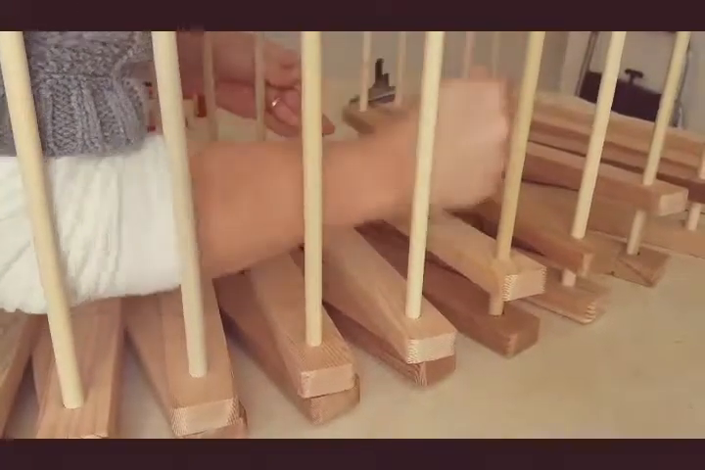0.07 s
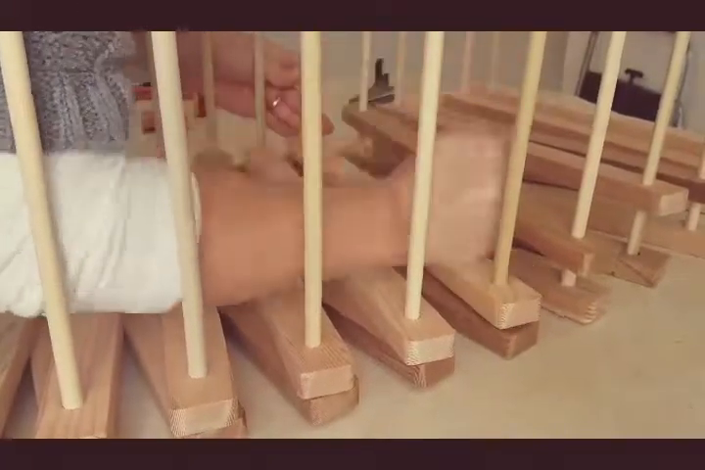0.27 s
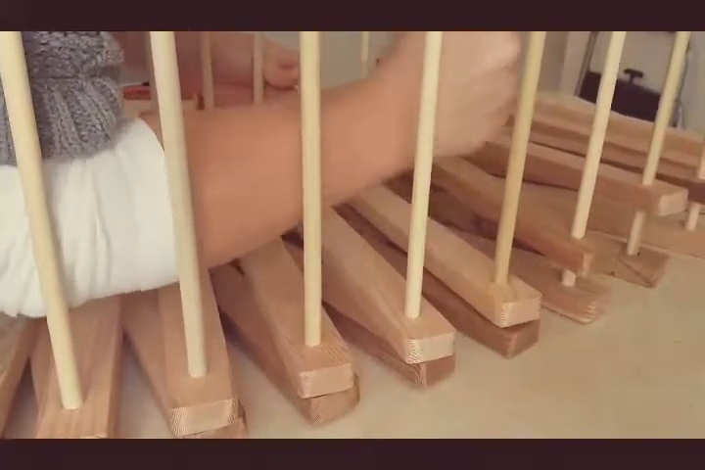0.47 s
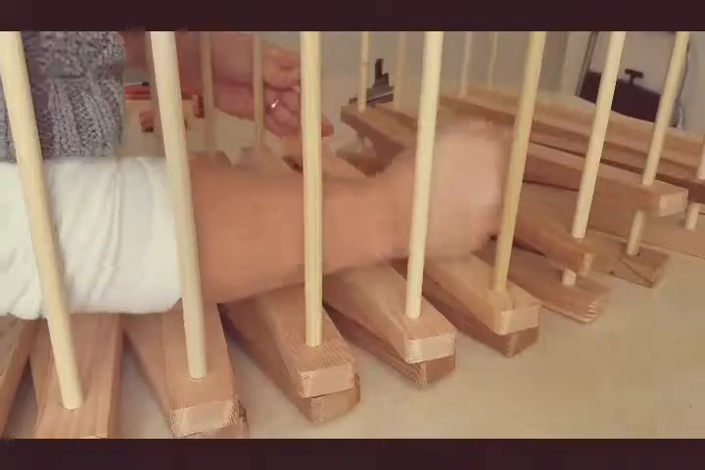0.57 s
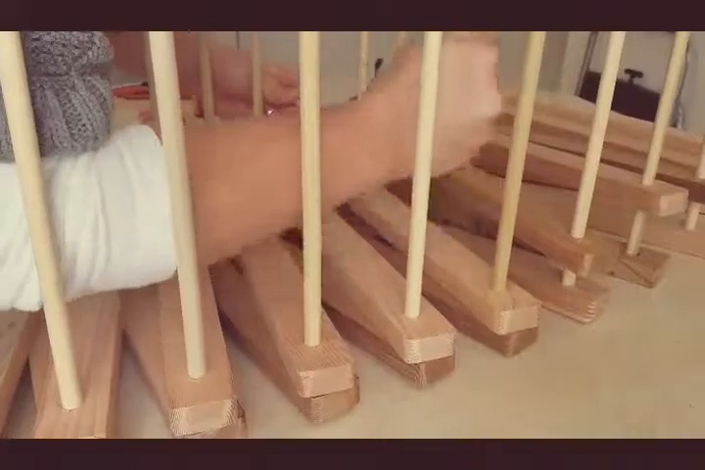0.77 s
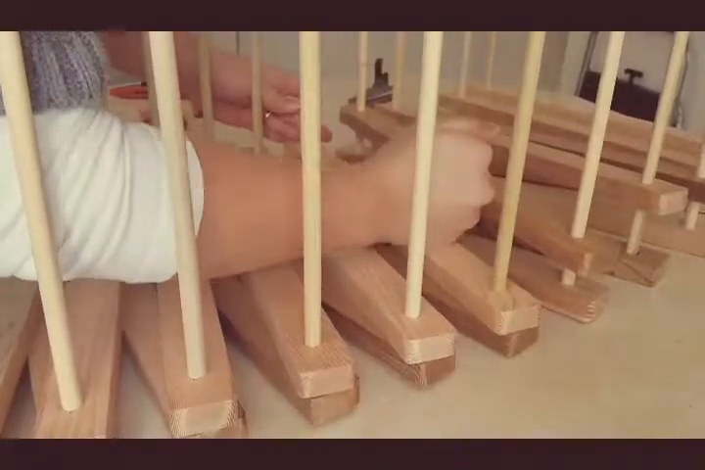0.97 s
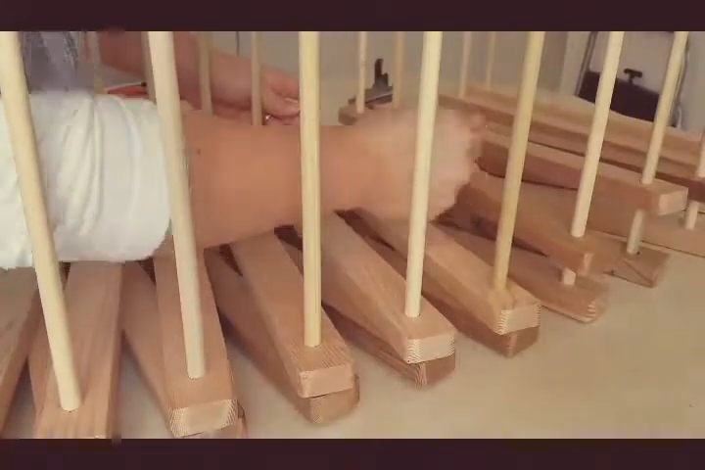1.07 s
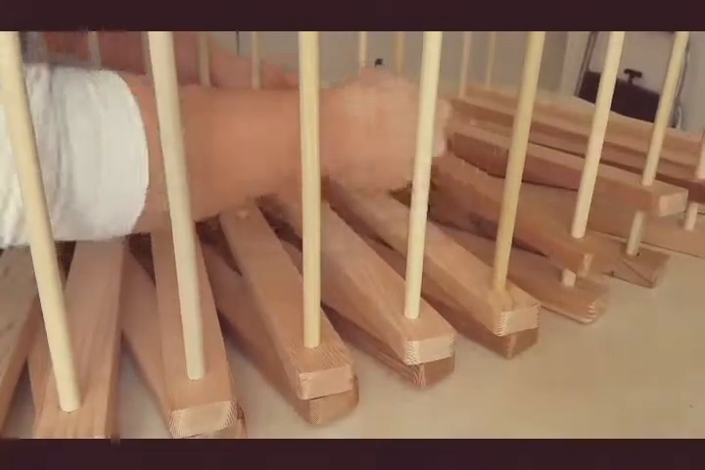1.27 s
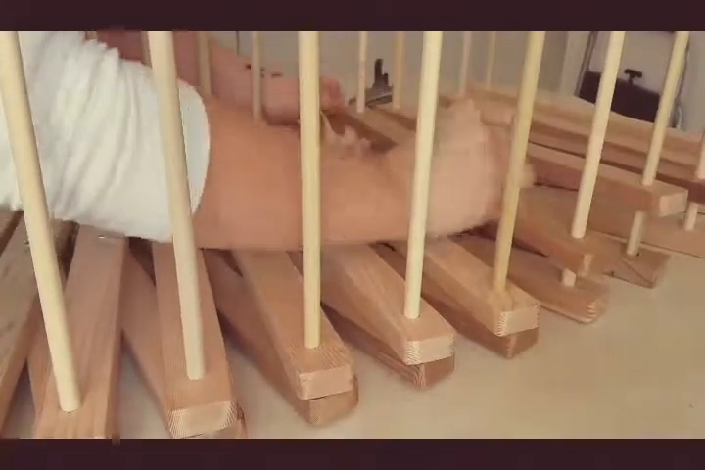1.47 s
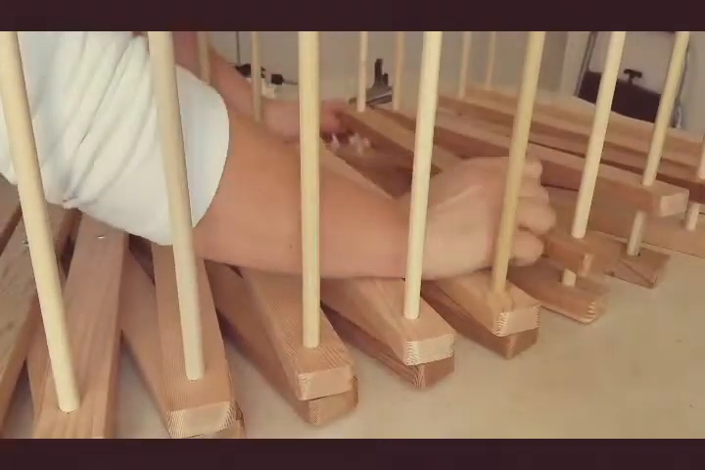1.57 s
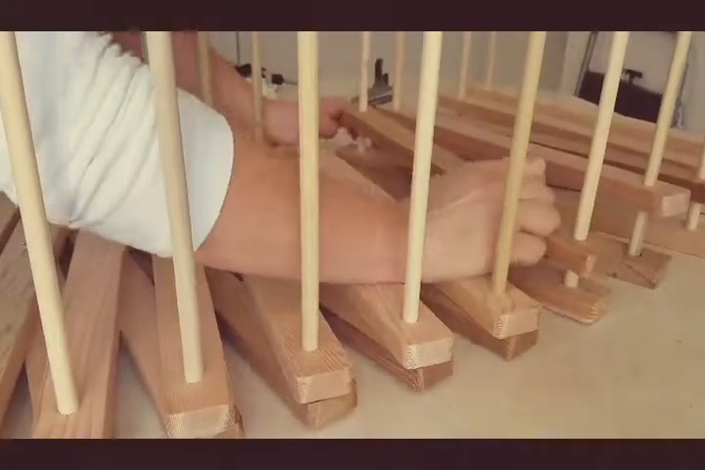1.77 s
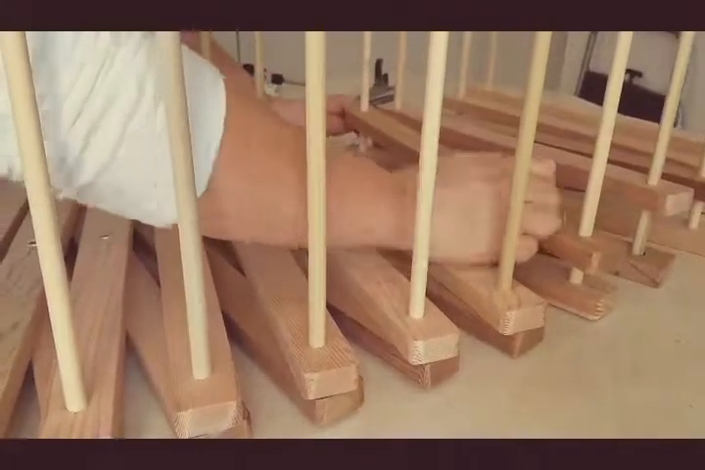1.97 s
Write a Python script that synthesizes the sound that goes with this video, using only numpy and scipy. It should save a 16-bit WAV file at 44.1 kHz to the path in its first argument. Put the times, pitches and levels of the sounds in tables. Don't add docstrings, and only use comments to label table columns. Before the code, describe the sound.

Wooden knocks on a table, close in a small hard room. Soft nudges, wood rubbing and a faint metallic tick open it. Loud hollow clacks with light pre-touches land at 0.24, 0.5, 0.73 and 1.0 seconds, the fourth brightest; a softer, duller thud follows at 1.32. Each rings briefly. Faint bumps near 1.6, a tiny ping at 1.84, then rubbing and a light knock at 2.03.

```python
import sys
import numpy as np
from scipy import signal
from scipy.io import wavfile
from scipy.ndimage import uniform_filter1d

SR = 44100
rng = np.random.default_rng(int(sys.argv[2]) if len(sys.argv) > 2 else 0)


def ratio(d):
    e = np.asarray(d, float) / 20
    return 10 ** e


def generate_wav(signal):
    frames = np.transpose(np.atleast_2d(signal))
    scaled = np.clip(frames, -1, 1) * 32767
    pcm = np.round(scaled).astype(np.int16)
    wavfile.write(sys.argv[1], SR, pcm)


N = 90405

# frequency in Hz, level in dB per Hz.
AIR = [(25, 5.5), (54, -5), (119, -4.5), (738, -17.5), (2340, -22), (4500, -33), (8000, -38.5),
       (13800, -32.5), (15400, -50.5)]
AIR_DB = -62
# time in seconds, level in dB.
HUM = [
    (0, -63),
    (1.571, -66),
    (1.6, -60),
    (1.72, -56.5),
    (1.8, -65.5),
    (2.05, -62),
]
HUM_HZ = 135
# time in seconds, level in dB.
SLIDE = [(0, -58.5), (0.049, -48), (.15, -65.5), (.35, -69), (.43, -57), (.49, -61.5), (0.522, -101.5),
         (1.93, -88), (1.97, -70), (1.999, -57), (2.05, -54)]
# frequency in Hz, level in dB per Hz.
RUB = [(120, -37.5), (200, -18.5), (617, -29), (990, -29.5), (12600, -44.5), (14600, -36), (15400, -65)]

# start in seconds, level in dB.
BUMPS = [
    (.001, -42.5),
    (.021, -40.5),
    (.056, -45),
    (.103, -46),
    (.40, -42),
    (1.598, -48.5),
    (1.624, -51),
    (1.655, -50),
    (1.70, -52),
]
# frequency in Hz, level in dB, T60 in seconds.
BUMP = [(160, -8.5, 0.084), (205.3, -4.5, .1), (245, 0, .1), (331, -6, 0.072), (500, -12, .06)]
# frequency in Hz, level in dB, T60 in seconds.
THUMP = [(115.9, 0.5, 0.17), (132, -5.5, 0.23)]
THUMP_S, THUMP_DB = 1.327, -13

# frequency in Hz, level in dB, T60 in seconds.
TICK = [(745, 5, .09), (950, -10, .1), (1850, -7, .22), (2480, -7, .18), (2510, -9, .18), (3200, -10, .17),
        (4000, -12, .12), (4800, -11, .12), (5900, -17, .1), (6900, -16, .1)]
TICK_S, TICK_DB = 0.033, -34
# frequency in Hz, level in dB, T60 in seconds.
PING = [(2350, 3, 0.092), (2300, -5, .05), (2450, -4, 0.09), (2520, -9, 0.047)]
PING_S, PING_DB = 1.842, -56.5
# frequency in Hz, level in dB, T60 in seconds.
LAST = [(130.5, 0.5, .2), (341, -7, .1), (560, -1.5, .1), (875, 0.5, 0.076)]
LAST_S, LAST_DB = 2.0355, -29

# start in seconds, level in dB, table thud in dB, clack in dB, edge in dB.
BLOWS = [
    (0.2423, -10, 7, -0.5, -5),
    (0.5011, -8, 4, -3.5, -9),
    (.7250, -8, 1.5, -2, -7),
    (1.009, -11, -1.5, 7, 2),
    (1.319, -16.5, 8, -5, -19),
]
# start in seconds, level in dB, thud in dB, clack in dB, edge in dB.
TOUCHES = [(.002, -45, 13, 3, -16), (0.026, -51, 9, 10, -15), (0.032, -52.5, 11, 17.5, 13),
           (0.039, -50.5, 2, 6, 17), (.10, -71, 3, 2, 2), (0.2354, -34.5, 0, -6, -4),
           (0.4975, -28, 9, -1, -2), (.697, -56, 4, -36, -5), (0.722, -51, -5, 17, 22),
           (1.0025, -25.5, -17, -7, -9), (1.3128, -25.5, 6, -6, -8.5), (1.3274, -32, 7, 7, 2),
           (1.33, -36.5, -4, 9, 5), (1.361, -41.5, -13, 3.5, -17), (1.595, -47.5, 19.5, -21, -24),
           (1.645, -64, 15, -9, -11), (1.69, -75, 14, -22, -7.5), (1.84, -64, -10, 8, 6),
           (1.90, -79, -10, 4.5, -2), (2.048, -47, 0, 0, 8.5), (1.958, -68.5, 0, -4, 9),
           (1.9804, -63, -3.5, 0, 12), (2.023, -42, 14, 1, -6), (2.044, -34, 27, -14, -18),
           (1.996, -46.5, 18, -2, -2), (2.035, -26.5, 8.5, -9.5, -41)]
COLOUR_HZ = [130, 600, 2550, 3100]
# frequency in Hz, level in dB per Hz.
BLOW = [(55, -35), (100, -11), (790, -9.5), (1250, -12), (2450, -24.5), (2950, -29.5), (7000, -45.5),
        (10000, -43), (14500, -47.5)]
BODY_NOISE_DB = -10
CRACK_HZ, CRACK_OCTAVES, CRACK_DB, CRACK_S = 4500, 1.1, 12, 0.0012
# frequency in Hz, T60 in seconds.
ROOM_T60 = [(60, 1), (160, 0.33), (420, 0.45), (1100, 0.42), (2900, 0.36), (7700, 0.35), (13000, 0.23)]
RISE_CYCLES, RISE_S = 0.2, 0.002
LATE_DB, LATE_T60_S = -18, 0.5
# frequency in Hz, left-right likeness from -1 to 1.
LIKENESS = [(40, 1), (100, 1), (250, 0.92), (600, 0.82), (1300, 0.16), (2600, -0.021), (5000, 0.26),
            (14000, -0.29)]
# frequency in Hz, left minus right in dB.
LEAN = [(60, -3.5), (180, -2.5), (550, -2.5), (1640, 2.5), (4950, 2), (14900, -0.5)]
EDGES = 26.4 * 2 ** np.arange(0, 9.4, 1 / 3)

FLUTTER_DB, FLUTTER_PER_S, BEAT_GROWS_S = 3.5, 30, 0.06
SWELL_CYCLES = 0.15

# frequency in Hz, level in dB, T60 in seconds.
DOWEL = [(1176, -3, .36), (1228, -1, .36), (1295, 1, .36), (1353, -2, .36), (1400, -4, .36),
         (1593, -7, .36), (1670, -2, .32), (1757, -4, .36), (1800, -6, .36), (1851, -7, .36),
         (1959, -8, .36), (2091, -8, .35), (2209, -8, .36), (2371, -7, .36)]
DOWEL_DB = [-31.5, -29, -31.5, -26.5, -36.5]
LANDING_S = [.0003, .0003, 0.00032, 0.00034, 0.0036]
HELD = [1.0, 0.9, 0.95, 0.91, 0.81]
TABLE_HZ = [112, 129, 161, 202, 234, 260, 280, 335, 357, 382, 479, 500, 522, 549]
TABLE_T60 = [0.23, 0.32, 0.35, 0.46, 0.22, 0.39, 0.37, 0.51, 0.32, 0.38, 0.36, 0.45, 0.45, 0.5]
TABLE_DB = [
    (-36, -19.0, -22.5, -23, -17.5, -21.5, -21.5, -29, -18.5, -25, -19, -20.5, -20, -24.0),
    (-30.5, -18.5, -26, -24, -21, -17.5, -17.5, -32.5, -21, -26.5, -17.0, -21, -17.5, -22),
    (-23.5, -10, -22, -27, -26, -31.5, -33, -29.5, -18, -19.5, -14.5, -21.5, -25.5, -35),
    (-31, -21, -44, -30.5, -35.5, -32.0, -28, -33.5, -22.5, -28.0, -20, -22.5, -28, -31.0),
    (-33.5, -19, -23.5, -23.5, -27, -28.5, -35.5, -54, -24.5, -31, -27, -38, -36.0, -36),
]
RACK_HZ = [576, 595, 621, 644, 698, 720, 787, 810, 850, 885, 928, 970, 1030, 1120]
RACK_T60 = [0.26, 0.32, 0.45, 0.33, 0.28, 0.27, 0.22, 0.33, 0.45, 0.39, 0.26, 0.4, 0.37, 0.29]
RACK_DB = [
    (-16, -27.0, -29.5, -17.5, -21.5, -24.5, -11, -26.5, -25, -25.5, -24.0, -29.5, -35.5, -35),
    (-14, -27, -29, -13, -18.5, -19.5, -11.5, -22.5, -30, -25.0, -19.5, -28, -33, -30.5),
    (-16.5, -21, -22.5, -16, -19.5, -20.5, -18, -23.5, -26.5, -31, -25, -27, -26, -27.5),
    (-17, -30, -35, -22.5, -19.5, -28, -26.5, -25, -33.5, -30.0, -26, -26.5, -24.5, -23),
    (-29.5, -43, -27, -28, -28.0, -26, -23, -28, -48, -32, -31, -33.5, -42, -28.5),
]
ARM_HZ = [
    [120, 338, 563, 790],
    [270, 335, 536, 720],
    [125, 345, 475, 640],
    [278, 384, 540, 1043],
    [200, 280, 345, 558],
]
ARM_DB = [
    [-17, -13.5, -15.5, -19],
    [-13, -15, -12.5, -20.5],
    [-12.5, -15, -24, -19],
    [-13.5, -24, -13, -21.5],
    [-30, -17.5, -20, -19.5],
]
ARM_T60 = [0.17, 0.16, 0.2, 0.13, 0.14]

# low edge in Hz, high edge in Hz, margin under the clack in dB.
MASKED = [(9300, 10400, 38), (10400, 11500, 37), (11500, 12400, 36), (12400, 13400, 34), (13400, 15200, 33)]
MASK_SOFT_DB, MASK_DEPTH_DB = 1.5, -35

TIME = np.arange(N) / SR
LEFT_RIGHT = np.array([[1], [-1]])


def at_hz(points, hz):
    table_hz, values = np.transpose(points)
    return np.interp(np.log(hz), np.log(table_hz), values)


def likeness(hz):
    return np.clip(at_hz(LIKENESS, hz), -0.9, 1)


def drift(rate):
    return np.interp(TIME * rate, np.arange(200), rng.standard_normal(200))


def bands():
    white = rng.standard_normal((2, 2, N + 4000))
    for k, (low, high) in enumerate(zip(EDGES, EDGES[1:])):
        band_pass = signal.butter(4, [low, high], "band", fs=SR, output="sos")
        mid, side = signal.sosfilt(band_pass, white[k % 2])[:, 4000:]
        hz = min(np.sqrt(low * high), 13500)
        alike = likeness(hz)
        lean = ratio(at_hz(LEAN, hz) * LEFT_RIGHT / 2)
        yield hz, lean * (np.sqrt(1 + alike) * mid + np.sqrt(1 - alike) * side * LEFT_RIGHT)


def size_of(spectrum):
    hz = np.sqrt(EDGES[1:] * EDGES[:-1])
    power = ratio(at_hz(spectrum, hz)) ** 2 * np.diff(EDGES)
    return np.sqrt(np.sum(power) * 2 / SR)


def dying(clicks, seconds):
    return signal.lfilter([1], [1, -np.exp(-1 / (seconds * SR))], clicks + 1e-18)


def ring(s, db, modes, rise_s):
    start = int(s * SR)
    t = np.arange(min(N - start, SR // 2)) / SR
    out = np.zeros((2, N))
    for hz, level_db, t60 in modes:
        apart = np.arccos(likeness(hz)) / 2 * rng.choice([-1, 1])
        wave = np.sin(2 * np.pi * hz * t + apart * LEFT_RIGHT + np.pi * rng.integers(2))
        swell = 1 - np.exp(-t / (rise_s + SWELL_CYCLES / hz))
        beat_db = FLUTTER_DB * drift(FLUTTER_PER_S)[:len(t)] * np.minimum(t / BEAT_GROWS_S, 1)
        fade_db = level_db - 60 * t / min(t60, 0.45)
        lean_db = LEFT_RIGHT * at_hz(LEAN, hz) / 2
        out[:, start:start + len(t)] += ratio(fade_db + beat_db + lean_db) * swell * wave
    return ratio(db) * out


def air_power(hz):
    return (ratio(AIR_DB + at_hz(AIR, hz) + 1.1 * drift(45)) / size_of(AIR)) ** 2


def hum():
    level_db = np.interp(TIME, *np.transpose(HUM))
    return ratio(level_db + 3 * drift(3.7)) * np.sin(2 * np.pi * HUM_HZ * TIME + 1.8 * drift(27))


def slide_level():
    level_db = np.interp(TIME, *np.transpose(SLIDE))
    return ratio(level_db + 0.88 * drift(84)) / size_of(RUB)


def contact_power(hz):
    rows = np.array([*BLOWS, *TOUCHES])
    colour_db = [np.interp(np.log(hz), np.log(COLOUR_HZ), [thud, 0, clack, edge])
                 for thud, clack, edge in rows[:, 2:]]
    diffuse_db = BODY_NOISE_DB * np.interp(hz, [1300, 2600], [1, 0])
    level_db = rows[:, 1] + colour_db + at_hz(BLOW, hz) + diffuse_db
    clicks = np.zeros(N)
    clicks[(rows[:, 0] * SR).astype(int)] = ratio(2 * level_db) / size_of(BLOW) ** 2
    per_t60 = 1 / (6 * np.log(10))
    late = ratio(2 * LATE_DB) / (1 + (hz / 6000) ** 4)
    tail = dying(clicks, at_hz(ROOM_T60, hz) * per_t60) + late * dying(clicks, LATE_T60_S * per_t60)
    tail = tail - (1 + late) * dying(clicks, RISE_S + RISE_CYCLES / hz)
    crack_colour = np.exp(-(np.log2(hz / CRACK_HZ) / CRACK_OCTAVES) ** 2)
    crack = ratio(2 * CRACK_DB) * dying(clicks, CRACK_S) * crack_colour
    return np.abs(tail) + crack


def contacts_slide_air():
    slide = slide_level()
    out = 0
    for hz, noise in bands():
        slide_power = (slide * ratio(at_hz(RUB, hz))) ** 2
        out = out + noise * np.sqrt(contact_power(hz) + slide_power + air_power(hz))
    return out


def bumps():
    thump = ring(THUMP_S, THUMP_DB, THUMP, 0.0027)
    return thump + sum(ring(s, db, BUMP, 0.0023) for s, db in BUMPS)


def fittings():
    tick = ring(TICK_S, TICK_DB, TICK, 0.0032)
    ping = ring(PING_S, PING_DB, PING, 0.0016)
    return tick + ping + ring(LAST_S, LAST_DB, LAST, 0.0004)


def body(k):
    hz = [*TABLE_HZ, *RACK_HZ, *ARM_HZ[k]]
    db = [*TABLE_DB[k], *RACK_DB[k], *ARM_DB[k]]
    t60 = [*(HELD[k] * np.array([*TABLE_T60, *RACK_T60]))] + [ARM_T60[k]] * len(ARM_HZ[k])
    return list(zip(hz, db, t60))


def arms():
    out = 0
    for k, row in enumerate(BLOWS):
        out = out + ring(row[0], 0, body(k), LANDING_S[k])
        out = out + ring(row[0], DOWEL_DB[k], DOWEL, 0.0015)
    return out


def scene():
    return contacts_slide_air() + hum() + bumps() + fittings() + arms()


def band_level(x, low_hz, high_hz):
    band_pass = signal.butter(6, [low_hz, high_hz], "band", fs=SR, output="sos")
    band = signal.sosfiltfilt(band_pass, x)
    power = uniform_filter1d(np.mean(band ** 2, axis=0), size=1024)
    return band, 10 * np.log10(power + 1e-14)


def mute_masked(x):
    clack_db = band_level(x, 1500, 3000)[1]
    for low_hz, high_hz, margin_db in MASKED:
        band, level_db = band_level(x, low_hz, high_hz)
        excess_db = clack_db - level_db - margin_db + MASK_SOFT_DB * drift(20)
        masked = 0.5 + 0.5 * np.tanh(excess_db / MASK_SOFT_DB)
        x = x - band * (1 - ratio(MASK_DEPTH_DB * masked))
    return x


def roll_off(x):
    return signal.sosfilt(signal.butter(12, 15530, fs=SR, output="sos"), x)


def record(dry):
    x = signal.sosfilt(signal.butter(2, 55, "high", fs=SR, output="sos"), dry)
    ceiling = 1.15
    x = ceiling * np.tanh(x / ceiling)
    x = signal.sosfilt(signal.cheby2(14, 40, 15150, fs=SR, output="sos"), x)
    return roll_off(mute_masked(x))


dry = scene()
out = record(dry)
generate_wav(out)
```